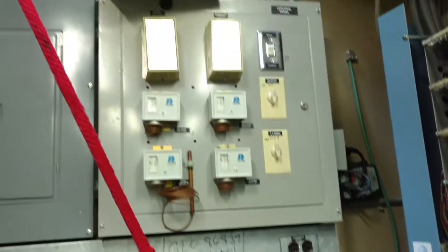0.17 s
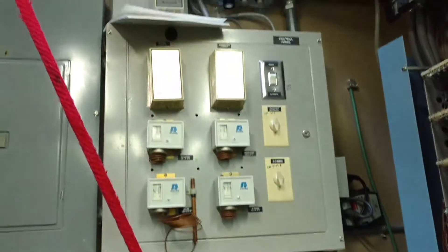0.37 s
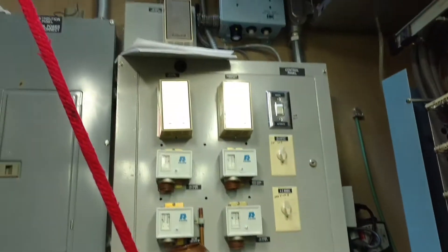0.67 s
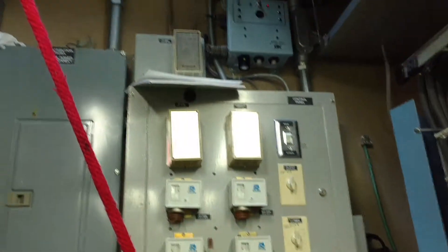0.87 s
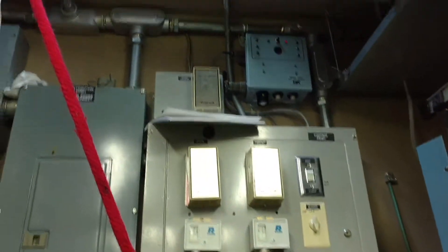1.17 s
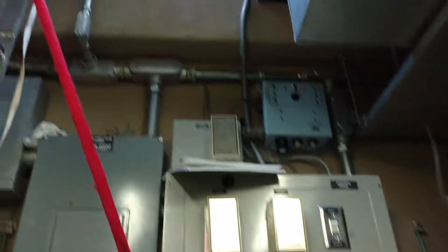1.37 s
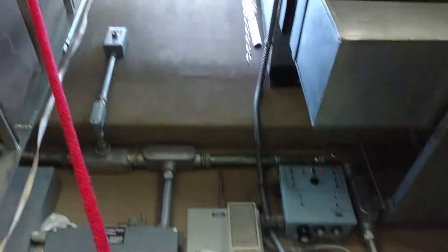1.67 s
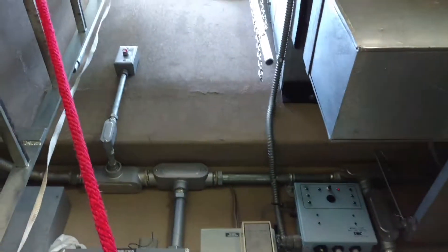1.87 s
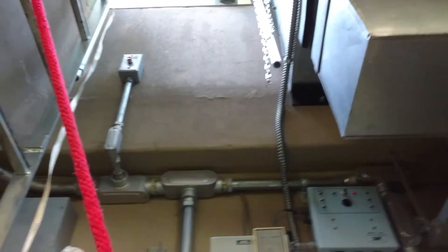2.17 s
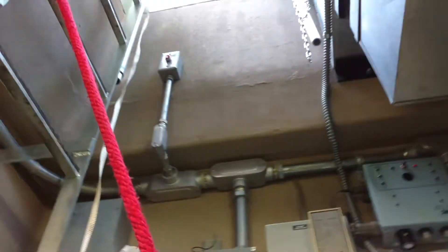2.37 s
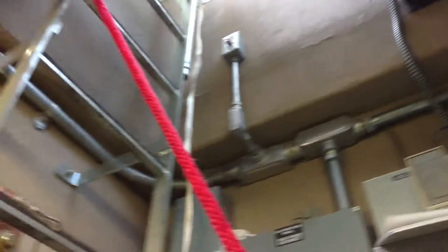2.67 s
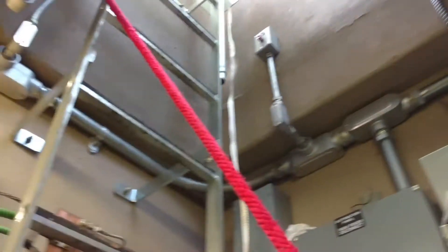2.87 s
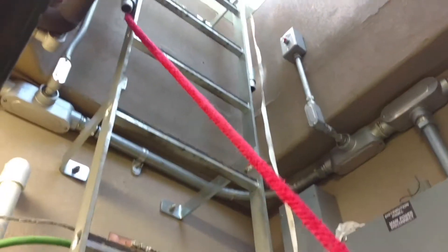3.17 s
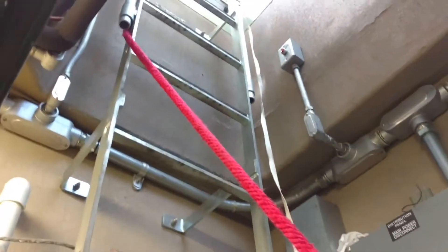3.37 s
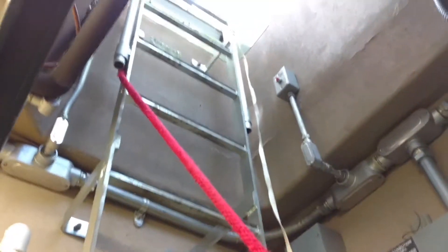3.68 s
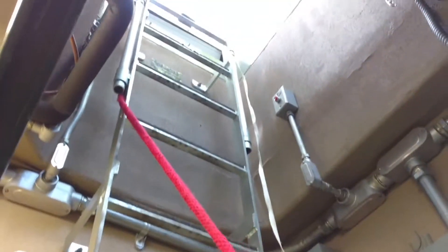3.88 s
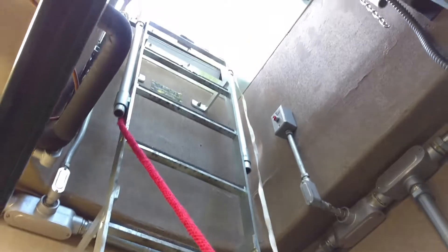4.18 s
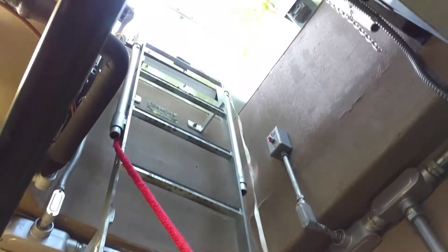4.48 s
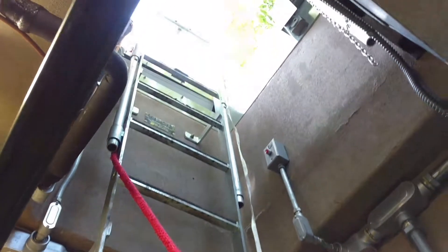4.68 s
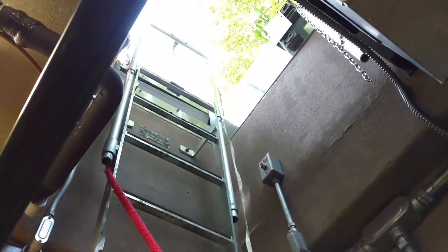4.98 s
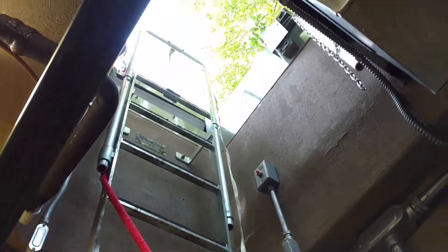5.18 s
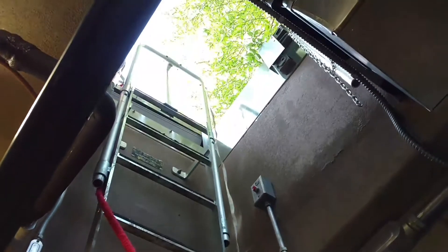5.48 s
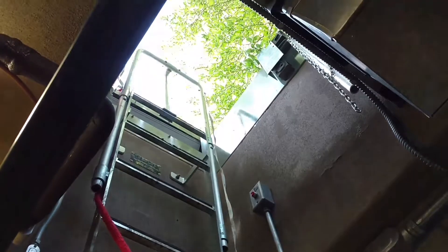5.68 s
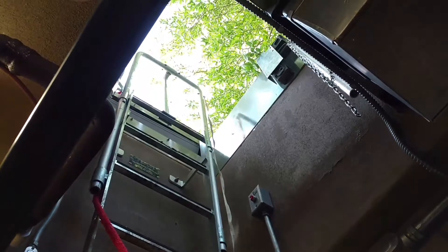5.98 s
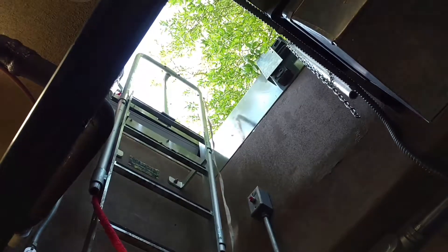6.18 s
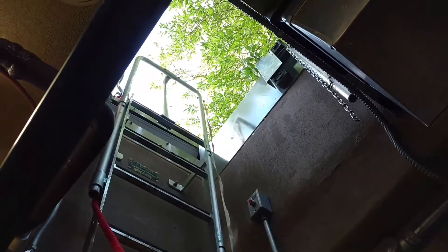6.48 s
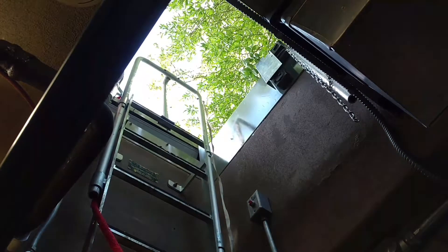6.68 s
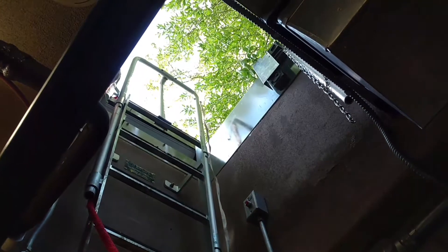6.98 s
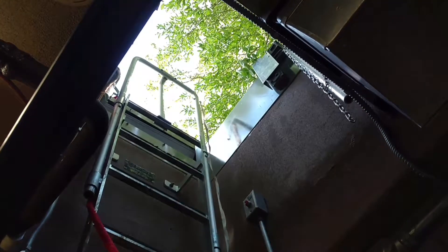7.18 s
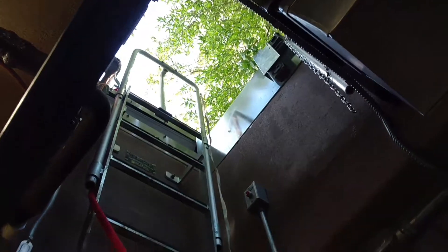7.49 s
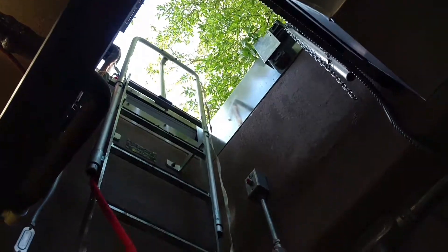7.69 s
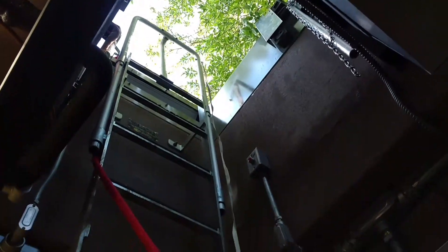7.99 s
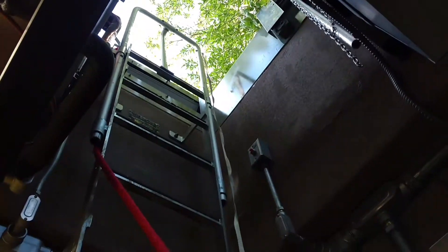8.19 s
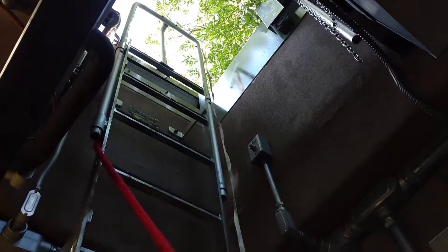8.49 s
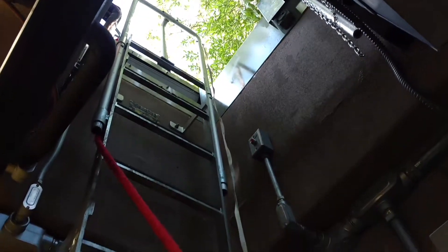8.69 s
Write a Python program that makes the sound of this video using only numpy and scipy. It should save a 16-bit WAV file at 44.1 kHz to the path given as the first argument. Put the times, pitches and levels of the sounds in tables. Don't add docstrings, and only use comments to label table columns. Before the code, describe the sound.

Steady ducted air roar and a wavering low-mid fan hum in an enclosed underground room, plus faint bright ticks, rubbing and a dull knock.

```python
import sys
import numpy as np
from scipy import signal
from scipy.io import wavfile
from scipy.ndimage import uniform_filter1d, map_coordinates

SR = 44100
rng = np.random.default_rng(int(sys.argv[2]) if len(sys.argv) > 2 else 0)


def generate_wav(sig):
    pcm = np.round(np.clip(np.atleast_2d(sig).T, -1, 1) * 32767).astype(np.int16)
    wavfile.write(sys.argv[1], SR, pcm)


def volts_from_decibels(level):
    exponent = np.asarray(level, float) / 20
    return 10 ** exponent


N = 390285

# (time [s], sideways turn [-1..1], tilt up to the hatch [0-1], air level at that spot [dB])
POSE = [
    (0, -.29, 0.26, -0.7),
    (1.7, -.25, 0, -0.04),
    (2.6, .7, 0.14, 1),
    (3.3, .95, 1, 0.14),
    (4.02, 0.98, 0.8, -0.45),
    (4.8, .95, 0.95, -0.9),
    (5.5, -0.0009, 1, -2.5),
    (6.3, .8, 1, -0.87),
    (8.85, .85, 0.9, -1),
]
# (time [s], place between the ports [-1..1], level [dB], pitch [Hz], brightness [dB/octave])
TICKS = [
    (1.78573, .9, -8.2, 5500, -2),
    (5.24082, -.38, -2, 6600, -11),
]
SKIP_AT_S, SKIP_S = 4.02, 0.02


def evened(x):
    return x / np.sqrt(np.mean(np.abs(x) ** 2) + 1e-20)


def columns(rows, at, scale=lambda v: v):
    first, *rest = np.transpose(rows)
    return [np.interp(scale(at), scale(first), column) for column in rest]


def resonate(x, hz, width):
    carrier = np.exp(2j * np.pi * np.cumsum(hz * np.ones(x.shape[-1])) / SR)
    r = np.exp(-np.pi * width / SR)
    smooth = signal.lfilter([(1 - r) ** 2], [1, -2 * r, r * r], x / carrier)
    return 2 * (carrier * smooth).real


def turns(hz, t):
    splice_s = 0.01
    jump = hz * SKIP_S % 1
    return hz * t + jump * np.clip((t - SKIP_AT_S) / splice_s + 0.5, 0, 1)


def rush():
    # (frequency [Hz], their sum [dB per Hz], their difference [dB per Hz])
    air = [(30, -79, -96), (60, -69.5, -79), (116, -58.5, -77), (174, -55.5, -73.5), (283, -54.5, -69.5),
           (400, -57.5, -69), (714, -61.5, -70), (1174, -65, -65), (2070, -76, -71.5), (2960, -78.5, -80.5),
           (5740, -89, -88), (8350, -91.5, -92.5), (13000, -93, -92), (13600, -104.2, -108.7)]
    # (frequency [Hz], width [Hz], lift of the sum [dB], lift of the difference [dB])
    ducts = [
        (192, 17.6, 4.5, 6),
        (223, 20, 9, 13.5),
        (475, 11.5, 2, -1),
        (500, 11, -4.5, 5.5),
        (604, 8.8, 5.5, 7.5),
        (700, 56, 4.5, 7),
        (1946, 47, 4, -4),
        (3360, 190, 2, 0.5),
    ]
    # (frequency [Hz], share in step [0-1], share a quarter turn off [0-1])
    lean = [(100, 0.35, 0.1), (170, .15, 0.1), (240, 0.4, 0.46), (400, 0, 0.23), (700, .35, .06),
            (1100, 0, -.15), (1900, 0, 0.23), (4000, .02, 0), (9500, 0.6, -.1)]
    rush_db, brightness_db_per_octave = -32, 0.195

    frames, hz = N // 512 + 5, np.fft.rfftfreq(2048, 1 / SR) + 1
    t = np.arange(frames)[:, None] * 512 / SR
    a, b, c, d, ripple, patches = np.moveaxis(rng.standard_normal((frames, 1025, 6)), 2, 0)
    ripple = evened(uniform_filter1d(uniform_filter1d(ripple, size=90, axis=0), size=2, axis=1))
    patches = evened(uniform_filter1d(uniform_filter1d(patches, size=5, axis=0), size=20, axis=1))

    turn, _, level_db = columns(POSE, t)
    sum_db, difference_db = columns(air, hz, np.log)
    for centre_hz, width, lift_db, side_lift_db in ducts:
        bell = np.exp(-((hz - centre_hz) / width) ** 2)
        sum_db = sum_db + lift_db * bell
        difference_db = difference_db + side_lift_db * bell

    in_step, quarter = columns(lean, hz, np.log)
    shared = in_step + 1j * quarter * turn
    both = a + 1j * b
    apart = shared * both + np.sqrt(np.clip(1 - abs(shared) ** 2, 0, 1)) * (c + 1j * d)
    both, apart = both * volts_from_decibels(sum_db), apart * volts_from_decibels(difference_db)

    edge_db = 0.06 * np.maximum(hz - 15450, 0)
    tone_db = level_db + brightness_db_per_octave * np.log2(hz / 1000) - edge_db
    field = volts_from_decibels(tone_db + 2.04 * ripple + 0.84 * patches)
    spectra = np.array([((both + apart) * field).T, ((both - apart) * field).T])
    ports = signal.istft(spectra, nperseg=2048, noverlap=1536)[1]
    return volts_from_decibels(rush_db) * evened(ports[:, :N])


def blades(t):
    blade_hz = (304.83, 308.64, 309.51)
    fan_start = (.6, .35, 0)
    fans = [
        (-35.5, -0.2, -5, .05),
        (-34.5, -2, -8, 0.14),
        (-31.5, -0.5, -6.5, 0.27),
    ]
    # (time [s], slow fan [dB], middle fan [dB], slow fan ahead [turns])
    spots = [
        (0, -7, -3, -0.029),
        (1.3, -0.5, 0.5, -0.053),
        (2.7, 2, 0.5, 0.15),
        (4.02, 2, -2.5, 0.14),
        (5.6, -3, -1.5, -0.1),
        (7.2, 2, -3, -0.039),
        (8.85, -2.5, -0.3, 0.11),
    ]
    tilted_lead = 0.073

    out, tilt = np.zeros((2, N)), columns(POSE, t)[1]
    slow_db, middle_db, ahead = columns(spots, t)
    for hz, start, fan, spot_db, slip in zip(blade_hz, fan_start, fans, (slow_db, middle_db, 0), (ahead, 0, 0)):
        level_db, wall_db, up_db, lead = fan
        angle = 2 * np.pi * (turns(hz, t) + start + slip)
        shade = volts_from_decibels(wall_db + (up_db - wall_db) * tilt)
        second = shade * np.cos(angle + lead + (tilted_lead - lead) * tilt)
        out += np.sqrt(2) * volts_from_decibels(level_db + spot_db) * np.array([np.cos(angle), second])
        out += volts_from_decibels(level_db + spot_db - 23.5) * np.cos(2 * angle) * [[1], [0.6]]
    return out


def standing(x):
    ripple_db, ripples_per_swing, ripples_per_s = 3.5, 4, 0.265
    hz, t, z = signal.stft(x, SR, nperseg=1024)
    turn, tilt, _ = columns(POSE, t)
    swing = np.cumsum(abs(np.gradient(turn)) + abs(np.gradient(tilt)))
    travel = ripples_per_swing * swing + ripples_per_s * t
    places = np.meshgrid(np.arange(len(hz)), travel, indexing="ij")
    ridges = map_coordinates(rng.standard_normal((len(hz), 40)), places, order=1)
    return signal.istft(z * volts_from_decibels(ripple_db * ridges), SR, nperseg=1024)[1][:, :N]


def whine(t):
    # (low edge [Hz], high edge [Hz])
    hiss_bands = [(10520, 11050), (10300, 11880), (11100, 11200), (11320, 11460), (11680, 11800),
                  (12900, 14300)]
    # (first port [dB], second port [dB])
    band_levels = [(-54.5, -60.5), (-53.5, -57.5), (-73, -79), (-73, -72), (-71, -72), (-68, -78)]
    # (centre time [s], half length [s], frequency [Hz], lift [dB])
    whistle_swells = [
        (6.4, 1.1, 10670, 13),
        (8.9, .5, 10920, 16),
    ]
    shaft_hz, dip_turns, tilt_turns = 19.8, 0.82, 0.17

    _, tilt, spot_db = columns(POSE, t)
    turn = 2 * np.pi * (turns(shaft_hz, t) - dip_turns - tilt_turns * tilt)
    depth_db = 3.5 + 2 * (t > SKIP_AT_S)
    throb = volts_from_decibels(-depth_db * (0.55 * np.cos(turn) + 0.3 * np.cos(2 * turn + 0.6)))
    throb = throb * volts_from_decibels(-0.5 + 0.88 * spot_db)

    hiss = rng.standard_normal((2, N))
    whistle_hz = 10750 + 120 * np.interp(t, np.arange(10), rng.standard_normal(10))
    whistle_db = -69
    for s, half, hz, lift_db in whistle_swells:
        near = np.exp(-((t - s) / half) ** 2)
        whistle_hz = whistle_hz + near * (hz - whistle_hz)
        whistle_db = whistle_db + near * lift_db
    whistle = volts_from_decibels(whistle_db) * evened(resonate(hiss, whistle_hz, 60)) * [[1], [0.35]]

    bands = np.zeros((2, N))
    for k, (edges, ports_db) in enumerate(zip(hiss_bands, band_levels)):
        band = signal.butter(3, edges, "bandpass", fs=SR, output="sos")
        fresh = np.roll(hiss, k * SR, axis=1)
        bands += volts_from_decibels(np.array(ports_db))[:, None] * evened(signal.sosfilt(band, fresh))
    return throb * (whistle + standing(bands))


def add(mix, t, s, hz, t60, size):
    near = slice(round(s * SR) - 100, round(s * SR) + 4000)
    age = np.maximum(t[near] - s, 0)
    swell = 1 - np.exp(-age * hz * 2.5)
    mix[near] += size * volts_from_decibels(-60 * age / t60) * swell * np.sin(2 * np.pi * hz * age)


def clicks(t):
    # (multiple of its pitch, level [dB], t60 [s])
    tick_modes = [(.57, -8.5, .002), (1, 0, .0012), (1.7, -3.5, .0012), (2.3, -1, .0012), (2.75, -5, .0012)]
    # (time [s], level [dB], second port relative to the first [dB])
    knocks = [
        (2.9915, -23, 0),
        (3.4073, -17, 2),
    ]
    # (frequency [Hz], level [dB], t60 [s])
    knock_modes = [(417, -4.5, .05), (465, -1.5, 0.052), (545, -7, 0.08), (254, -2.5, 0.073),
                   (2000, -18, 0.033)]
    across_shell_s, far_pitch, far_ring = 0.00031, 1.14, 1.7

    out = np.zeros((2, N))
    for s, place, db, pitch_hz, bright_db in TICKS:
        near = int(place > 0)
        for multiple, mode_db, t60 in tick_modes:
            hz = pitch_hz * multiple
            size = volts_from_decibels(db + mode_db + bright_db * max(np.log2(multiple), 0))
            far_size = (abs(place) - 1) * size
            add(out[near], t, s, hz, t60, size)
            add(out[1 - near], t, s + across_shell_s, far_pitch * hz, far_ring * t60, far_size)
    for s, db, second_db in knocks:
        for hz, mode_db, t60 in knock_modes:
            add(out[0], t, s, hz, t60, volts_from_decibels(db + mode_db))
            add(out[1], t, s, hz, t60, volts_from_decibels(db + mode_db + second_db))
    for port, thump_db in zip(out, (-21, -30.5)):
        add(port, t, SKIP_AT_S, 45, 0.04, volts_from_decibels(thump_db))
    return out


def scuffs(t):
    # (time [s], level [dB], brightness [dB/octave], rise [s], tail stretch [times])
    brushes = [
        (.31, -47, 8, .003, 0.24),
        (2.916, -52, 7, .016, .8),
        (2.96, -43.5, -14, 0.032, 1),
        (3.395, -44, 5.5, .0075, 1),
        (3.412, -28, 0, .003, 1),
        (8.06, -60, 12, .02, 1),
    ]
    # (frequency [Hz], width [Hz], level [dB], t60 [s])
    grit_modes = [(640, 740, -10.5, 0.28), (2050, 1600, 0, 0.24), (3930, 2500, -6.5, 0.27),
                  (6200, 1800, -14.5, 0.18)]
    # (time [s], level [dB], frequency [Hz], t60 [s])
    rubs = [
        (.2, -51.5, 3400, 0.91),
        (.27, -43, 1470, 1),
        (.33, -50, 2960, 0.59),
        (1.08, -47, 1400, 1),
    ]
    rub_width, rub_rise = 0.24, 0.21

    bursts = [(s, db, hz, rub_width * hz, rub_rise * t60, t60) for s, db, hz, t60 in rubs]
    for s, db, bright_db, rise, stretch in brushes:
        for hz, width, band_db, t60 in grit_modes:
            burst_db = db + band_db + bright_db * np.log2(hz / 2000)
            bursts.append((s, burst_db, hz, width, rise, t60 * stretch))
    bursts.append((TICKS[0][0] + 0.0021, -30, 9000, 5500, 0.0004, 0.004))

    out = np.zeros((2, N))
    for s, db, hz, width, rise, t60 in bursts:
        near = slice(max(round(s * SR) - 8000, 0), round(s * SR) + 16000)
        age = t[near] - s
        noise = rng.standard_normal((3, 24000))[:, :len(age)]
        noise = 0.52 * noise[2] + noise[:2]
        shape = np.where(age < 0, np.exp(-(age / rise) ** 2), volts_from_decibels(-60 * np.maximum(age, 0) / t60))
        out[:, near] += volts_from_decibels(db) * shape * evened(resonate(noise, hz, width))
    return signal.sosfilt(signal.butter(6, 13500, fs=SR, output="sos"), out)


def drone(t):
    # (start [s], length [s], level at the start [dB], level at the end [dB])
    hum_swells = [
        (2.198, 1.35, -48, -41.5),
        (4.754, 0.83, -44, -50.5),
    ]
    hum_hz, floor_db, edge_s = 95.7, -57, 0.21

    size = volts_from_decibels(floor_db) * np.ones(N)
    for start, length, first_db, last_db in hum_swells:
        end = start + length
        edges = np.clip(np.minimum(t - start, end - t) / edge_s + 0.5, 0, 1)
        size += edges ** 2 * volts_from_decibels(np.interp(t, [start, end], [first_db, last_db]))
    fuzz = evened(resonate(rng.standard_normal(N), hum_hz, 3.3))
    return size * evened(0.19 * fuzz + np.sin(2 * np.pi * hum_hz * t))


def scene():
    t = np.arange(N) / SR
    return rush() + blades(t) + whine(t) + clicks(t) + scuffs(t) + drone(t)


def top_cut(x):
    return signal.sosfilt(signal.butter(12, 16530, fs=SR, output="sos"), x)


def record(dry):
    # (frequency [Hz], share [0-1])
    cross = [(0, .88), (1300, .84), (2600, .82), (3900, .78), (7000, .9), (10300, .55), (13000, .76),
             (22050, .76)]
    port_delay, flutter_s = 17, 0.03

    late = np.pad(dry[::-1], ((0, 0), (port_delay, 0)))[:, :N]
    subtract = signal.firwin2(33, *np.transpose(cross), fs=SR)[None]
    aimed = dry - signal.oaconvolve(late, subtract, "same")
    flutter = np.interp(np.arange(N) / SR / flutter_s, np.arange(900), rng.standard_normal(900))
    treble = signal.butter(1, 900, "highpass", fs=SR, output="sos")
    aimed -= 0.1 * flutter * signal.sosfilt(treble, late)

    sharpness = abs(np.diff(aimed, n=2, prepend=0, append=0)).max(0)
    edge_db = 20 * np.log10(sharpness + 1e-9)
    fall = np.arange(N) * 9.33 / SR
    over_db = np.maximum(np.maximum.accumulate(edge_db + fall) - fall + 14.5, 0)
    dip_db = uniform_filter1d(np.pad(over_db, (85, 0))[:N], size=60)
    band = signal.firwin(127, 16200, fs=SR)[None]
    return top_cut(signal.oaconvolve(aimed / volts_from_decibels(dip_db), band, "same"))


dry = scene()
out = record(dry)
generate_wav(out)
```